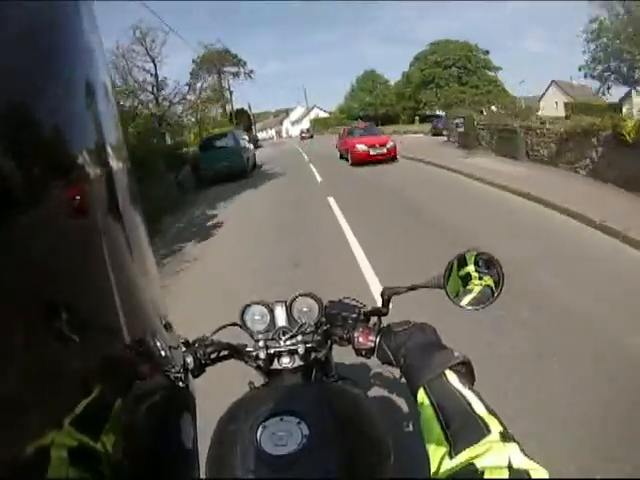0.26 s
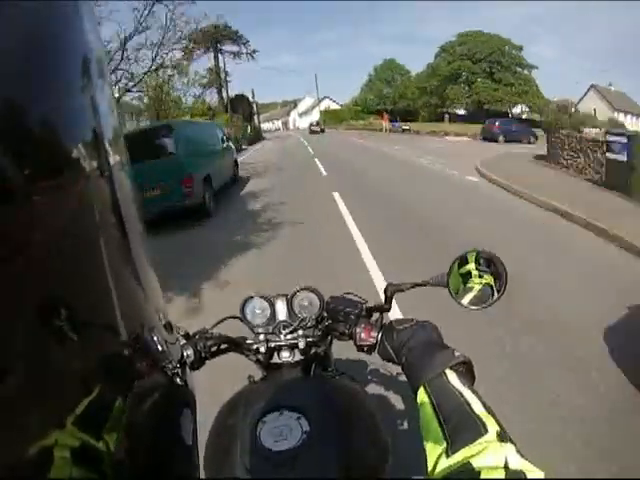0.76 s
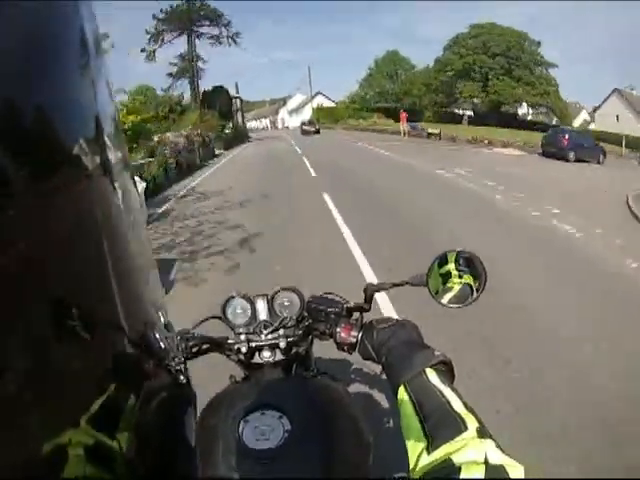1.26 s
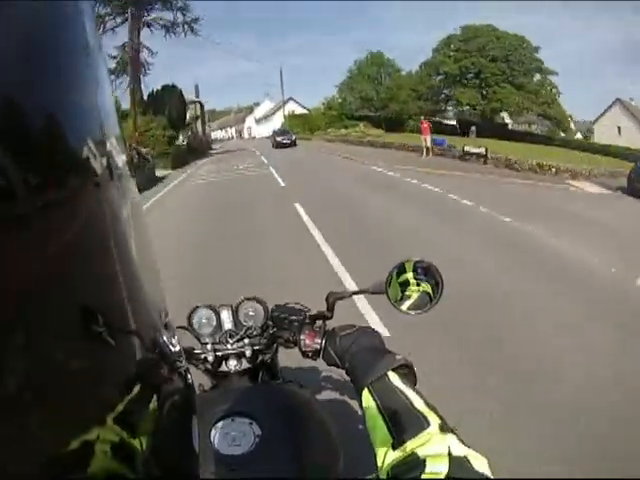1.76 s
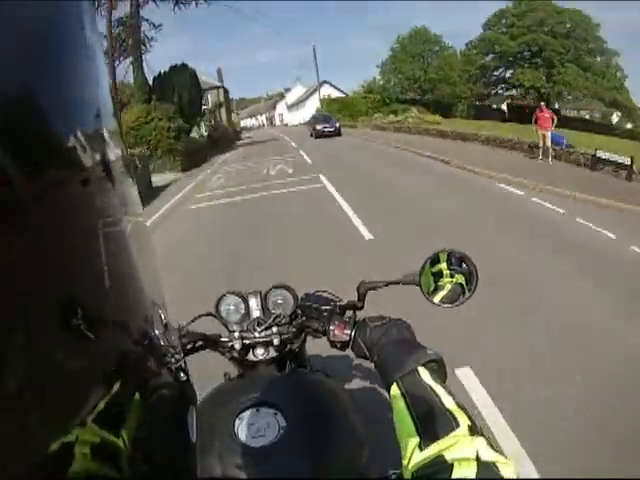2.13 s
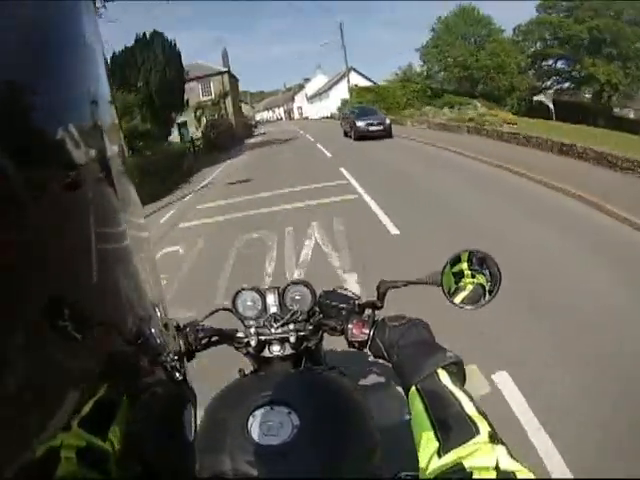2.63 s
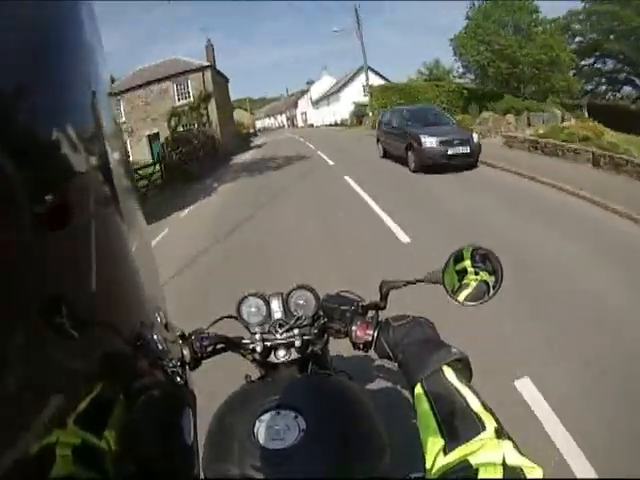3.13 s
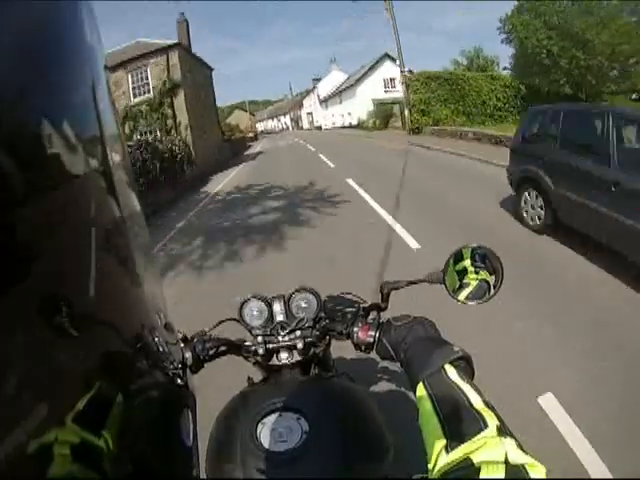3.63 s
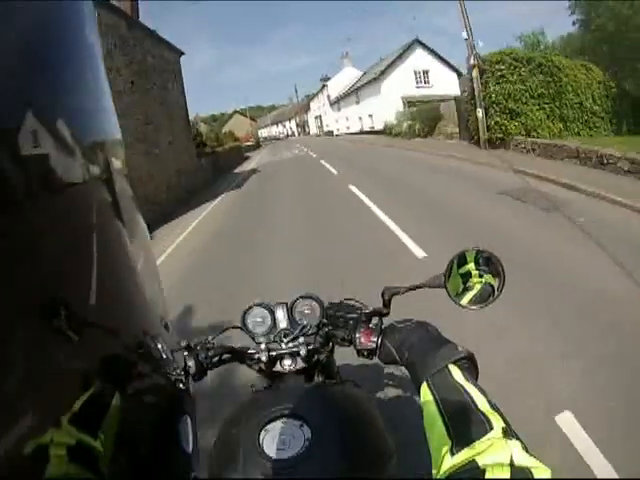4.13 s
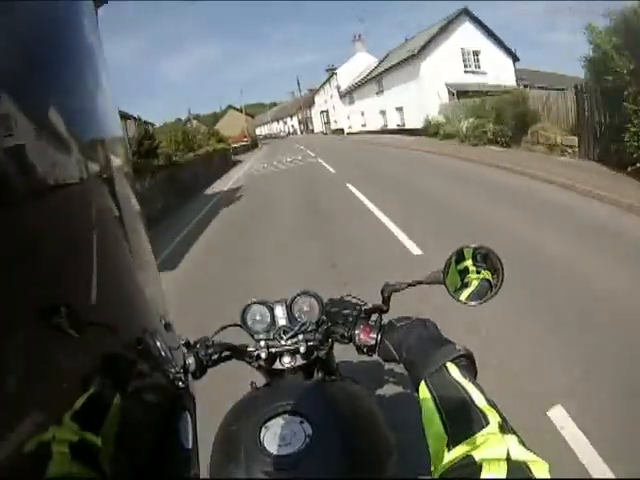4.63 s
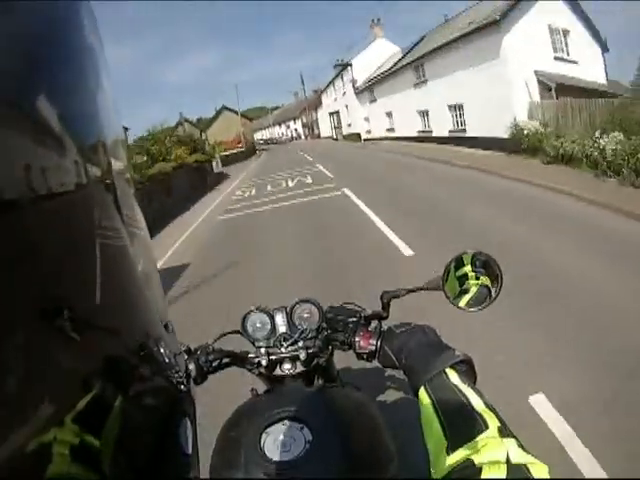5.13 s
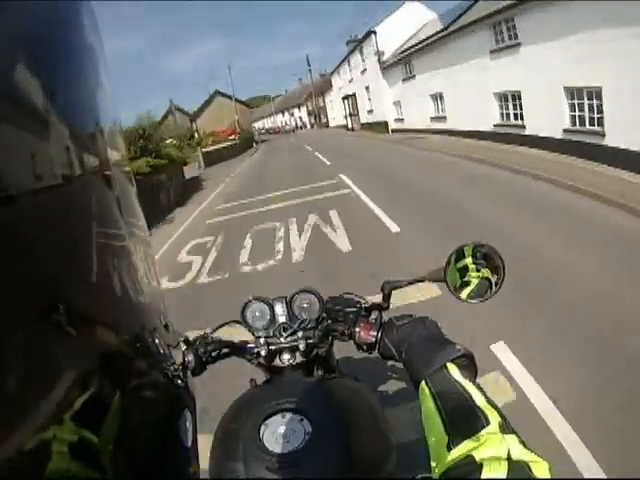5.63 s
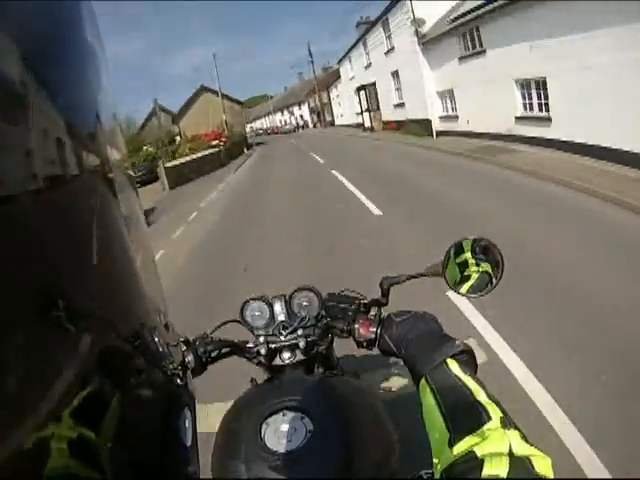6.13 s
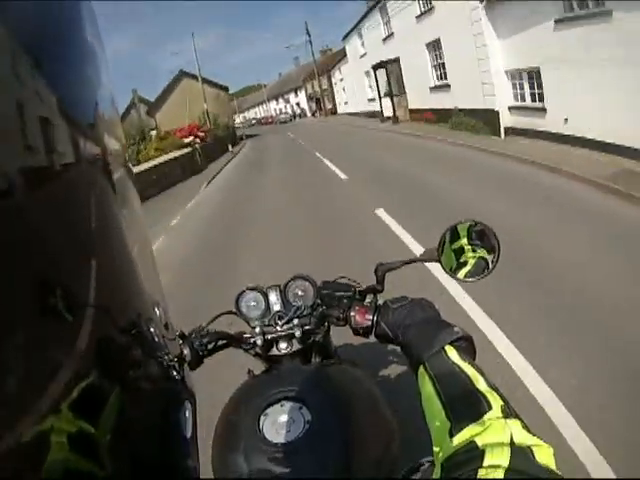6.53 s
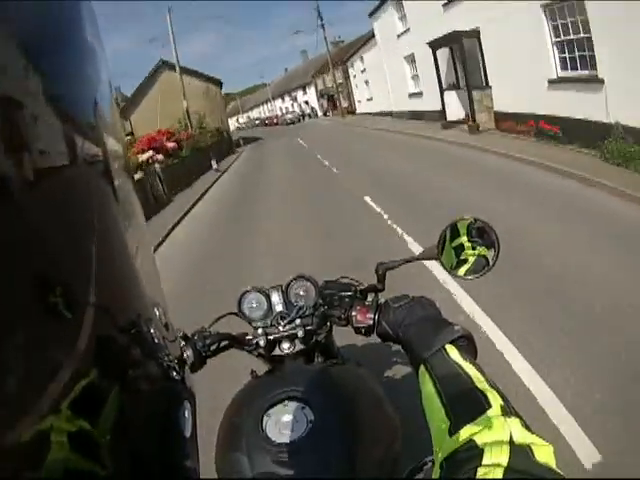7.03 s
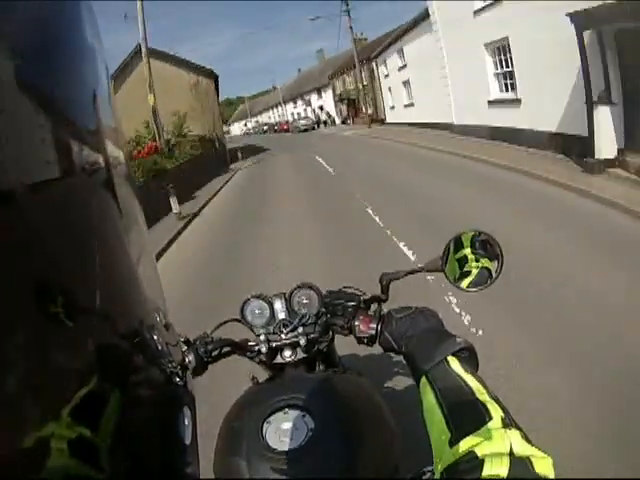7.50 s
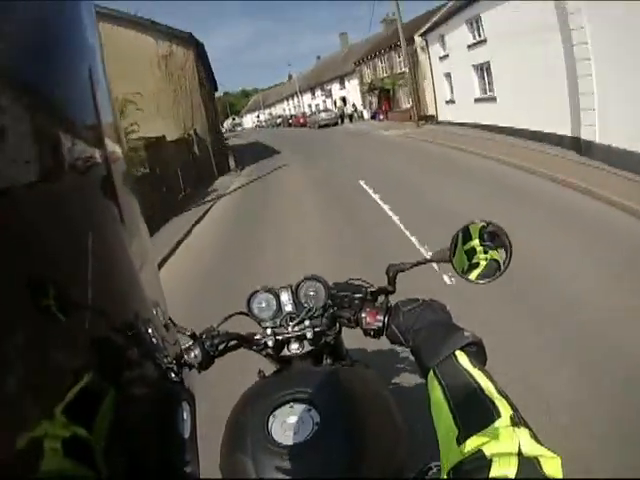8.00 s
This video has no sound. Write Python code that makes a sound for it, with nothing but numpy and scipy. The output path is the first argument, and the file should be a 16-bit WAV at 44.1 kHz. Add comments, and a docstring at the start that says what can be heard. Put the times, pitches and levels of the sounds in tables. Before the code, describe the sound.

Wind rushes, rumbles and hisses over a small cased camera on a motorcycle rider's helmet, with a deep, fluttering buffet coming in uneven shoves. The engine hums faintly and evenly underneath. Grit ticks lightly on the case a couple of times, and later a bump gives one small knock. The wind gradually eases as the bike slows along a village road.

```python
"""Wind rumbles, rushes and hisses over a small camera in a closed plastic case on a rider's helmet,
easing as the motorcycle slows through a village. The case's resonances (the pitches it likes to
ring at) colour the wind, and swirls of air shake the camera's mount into a deep, unsteady tone.
The twin engine hums faintly below. A bump knocks the case once and grit ticks on it.
Behind it all lies the soft hiss of the microphone's electronics."""
import sys
import numpy as np
from scipy import signal
from scipy.fft import rfft, irfft, next_fast_len
from scipy.io import wavfile
from scipy.ndimage import uniform_filter1d, map_coordinates

SR = 44100
rng = np.random.default_rng(int(sys.argv[2]) if len(sys.argv) > 2 else 0)


def generate_wav(signal):
    """Clip the signal to [-1, 1] and save it as 16-bit WAV at the path in sys.argv[1]."""
    frames = np.transpose(np.atleast_2d(signal))
    scaled = np.clip(frames, -1, 1) * 32767
    pcm = np.round(scaled).astype(np.int16)
    wavfile.write(sys.argv[1], SR, pcm)


N = 364266


def amp(db):
    """Turn decibels into a number to multiply by."""
    return 10 ** (np.asarray(db) / 20)


def unit(x):
    """Scale a signal to an average (rms) size of 1."""
    return x / np.sqrt(np.mean(x ** 2) + 1e-20)


def level_at(points, hz):
    """Read between (frequency, level) points, on a log frequency scale."""
    freqs, levels = np.transpose(points)
    return np.interp(np.log(hz + 1), np.log(freqs + 1), levels)


def curves(rows):
    """Join timed rows with straight lines: one curve for each column after the time."""
    times, *columns = np.transpose(rows)
    return [np.interp(np.arange(N) / SR, times, column) for column in columns]


def swells(rows):
    """Add up one bell-shaped swell for each (peak time, length, height) row."""
    t = np.arange(N) / SR
    return sum(height * np.exp(-(2 * (t - peak) / length) ** 2) for peak, length, height in rows)


def wobble(rate):
    """A smooth curve through `rate` random values a second."""
    return map_coordinates(rng.standard_normal(int(N * rate / SR) + 4), [np.arange(N) * rate / SR])


def filtered(x, response):
    """Multiply each frequency in x by response(frequency)."""
    size = next_fast_len(N + SR // 2)
    return irfft(rfft(x, size) * response(np.fft.rfftfreq(size, 1 / SR)), size)[:N]


def shaped_noise(shape):
    """Steady noise of size 1, strong or weak at each frequency as the shape says."""
    return unit(filtered(rng.standard_normal(N), lambda hz: amp(level_at(shape, hz))))


# Tone colour of the electronic hiss: (frequency [Hz], relative level [dB])
ELECTRONICS_SHAPE = [(100, -12), (3000, 2.5), (9000, -11), (12000, -11), (14000, -12), (15500, -20)]

def electronics():
    """The microphone's electronics add a faint, steady hiss."""
    return amp(-66.0) * shaped_noise(ELECTRONICS_SHAPE)


# How the engine runs: (time [s], four-stroke cycles [per s], level [dB])
ENGINE_RUN = [(0, 24.5, -54), (1, 24.7, -52), (2, 24.8, -51), (3, 24.9, -51), (3.8, 25, -53),
              (4.5, 25.3, -58), (5.5, 25.7, -57), (6.3, 25.8, -52), (7, 25.6, -51), (7.7, 25.5, -52),
              (8.26, 25.6, -53)]
# The tones in its hum: (multiple of the cycle rate, relative level [dB])
ENGINE_TONES = [(3, -26), (4, -2), (5, -4.5), (7, -9.5), (10, -10.5), (11, -10.5)]

def engine():
    """The two cylinders fire unevenly, making a hum of low tones that each waver."""
    cycle_hz, level_db = curves(ENGINE_RUN)
    phase = 2 * np.pi * np.cumsum(cycle_hz) / SR + 0.21 * wobble(6)
    hum = sum(amp(tone_db + 2.1 * wobble(5)) * np.sqrt(2) * np.sin(multiple * phase)
              for multiple, tone_db in ENGINE_TONES)
    return amp(level_db) * hum


# Where the case rings; these also colour the wind: (pitch [Hz], width [Hz], wind boost [dB],
# strength when hit [dB], time to fade by 60 dB [s])
CASE_RESONANCES = [(98, 17, 1.5, 3, 0.11), (192, 42, -0.5, -3, .05), (274, 28, 5.5, 3.5, 0.078),
                   (427, 70, 1, -4, 0.1), (548, 43, 3, 4, 0.048), (932, 150, 3.5, -6.5, 0.053),
                   (1188, 102, 3.5, -3, 0.04), (1382, 260, 4.5, 6, 0.027), (1717, 180, -2.5, -0.5, 0.036),
                   (2126, 250, 1, 8, 0.025), (2546, 310, 3, -14, 0.025), (3050, 150, 4.5, -22, 0.024),
                   (3896, 160, 4.5, -12, 0.016), (4610, 120, 5.5, -20, .015), (4967, 165, 6, -25, .015),
                   (5090, 220, 6, -25, .015), (6180, 300, -1, -13, 0.015), (6457, 360, 10, -22, .012),
                   (8260, 440, 5, -28, .01), (11400, 1200, 3, -26, 0.0055), (13300, 650, 3, -37, .005)]
# Grit ticks, then the bump: (time [s], strength [dB], centre pitch [Hz], spread [octaves], contact [s])
HITS = [(2.0062, -11, 12500, 0.45, .0004), (3.4172, -24.5, 2300, 0.5, 0.0018),
        (3.419, -21, 5900, 0.43, 0.0011), (5.6034, -22.5, 1300, 1.22, 0.0018),
        (5.6066, -22, 200, 1.4, 0.0015)]

def case_hits():
    """Each hit rings the case, favouring the resonances near the hit's centre pitch."""
    track = np.zeros(N + SR)
    t = np.arange(SR // 5) / SR
    for start, hit_db, centre_hz, spread, contact in HITS:
        ring = 0
        for k, (hz, _, _, ring_db, fade_time) in enumerate(CASE_RESONANCES):
            off_centre_db = -6 * (np.log2(hz / centre_hz) / spread) ** 2
            fade = amp(ring_db + off_centre_db - 60 * t / fade_time)
            ring += (-1) ** k * fade * np.sin(2 * np.pi * hz * t)  # neighbours swing opposite ways
        rise = 1 - np.exp(-(t / contact) ** 2)
        track[round(start * SR):][:len(t)] += amp(hit_db) * rise * ring
    return track[:N]


# The mount's shaking: (time [s], pitch [Hz], level between shoves [dB])
MOUNT_TREND = [(0, 40, -36), (0.5, 41.97, -41.5), (0.8, 39.9, -43), (1.1, 43.64, -38), (1.5, 40.64, -41),
               (2.0, 42.47, -36), (2.4, 40.44, -40.5), (3.2, 44.95, -41.5), (3.65, 44.3, -48),
               (3.95, 40, -36), (4.5, 44, -46), (5.0, 38.43, -38.5), (5.4, 41.7, -43.5), (5.8, 38, -44.5),
               (6.5, 38.83, -43.5), (7.0, 41, -40), (7.6, 39.7, -44.5), (7.85, 33, -44.5),
               (8.26, 34.7, -47)]
# The wind's strongest shoves on the mount: (peak time [s], length [s], level [dB])
SHOVES = [(0.096, 0.067, -31.5), (0.32, 0.063, -35), (0.467, 0.11, -30), (0.603, 0.11, -29.5),
          (0.887, 0.034, -34), (0.998, .12, -30.5), (1.364, 0.098, -31.5), (1.588, .1, -39.5),
          (1.852, 0.24, -34), (2.085, 0.056, -31.5), (2.186, 0.058, -31.5), (2.45, 0.11, -32),
          (2.632, .06, -35), (2.75, 0.1, -32), (3.012, 0.082, -38), (3.16, .08, -37), (3.31, 0.078, -32.5),
          (3.466, 0.074, -31.5), (3.569, .06, -33), (3.762, 0.093, -33), (3.93, 0.13, -40),
          (4.171, 0.07, -40), (4.321, 0.066, -44), (4.602, .06, -37), (4.70, 0.061, -36.5),
          (5.062, .08, -37), (5.24, 0.098, -45), (5.632, 0.078, -39), (6.289, .1, -40), (6.43, 0.063, -38),
          (6.60, 0.088, -35), (6.82, 0.082, -40), (7.23, .12, -36.5), (7.54, .2, -37), (8.02, .1, -42),
          (8.167, 0.074, -42)]
# Tone colour of the air's low thudding: (frequency [Hz], relative level [dB])
THUD_SHAPE = [(8, -48), (15, -10), (27, 4.5), (40, -9.5), (52, -2), (66, -16.5), (90, -42), (200, -120)]

def mount_shake():
    """Swirls of air keep kicking the mount's lowest resonance: an unsteady tone amid low thudding."""
    hz, calm_db = curves(MOUNT_TREND)
    shoves = swells([(peak, length, amp(db)) for peak, length, db in SHOVES])
    swing = amp(calm_db + 2.3 * wobble(13)) + shoves
    flutter = amp(1.5 * wobble(45))
    phase = 2 * np.pi * np.cumsum(hz + 2.546 * wobble(30)) / SR
    tone = np.sqrt(2) * flutter * np.sin(phase)
    average_swing = uniform_filter1d(swing, size=SR // 2)
    thud_gain = amp(-8.5) * average_swing * (swing / average_swing) ** 0.25  # partly follows each shove
    return swing * tone + thud_gain * shaped_noise(THUD_SHAPE)


def case_boost_db(hz):
    """Each resonance of the case raises (or slightly lowers) the noise near its pitch."""
    return sum(boost_db / (1 + (2 * (hz - pitch) / width) ** 2)
               for pitch, width, boost_db, *_ in CASE_RESONANCES)


def air_noise(shape, patchy_db):
    """Noise of size 1 with random louder and softer patches, heard through the case."""
    grid = signal.stft(rng.standard_normal(N), nperseg=512)[2]  # noise split by frequency and time
    patches = uniform_filter1d(rng.standard_normal(grid.shape), size=8, axis=0)
    patches = uniform_filter1d(patches, size=8, axis=1)
    noise = signal.istft(grid * amp(patchy_db * unit(patches)), nperseg=512)[1][:N]
    return unit(filtered(noise, lambda hz: amp(level_at(shape, hz) + case_boost_db(hz))))


# The wind easing as the bike slows: (time [s], rumble [dB], rush [dB], hiss [dB])
WIND_LEVELS = [(0, -36, -34.5, -45.5), (0.6, -38.5, -35, -46.5), (1.0, -39, -36.5, -48.5),
               (1.3, -40.5, -38.5, -51.5), (2.2, -40, -38, -51.5), (3.0, -41, -38.5, -51.5),
               (3.5, -40.5, -39, -50.5), (4.1, -42, -39.5, -51.5), (5.0, -42, -40, -53.5),
               (5.3, -43.5, -42, -56), (5.6, -44.5, -43.5, -57.5), (7.0, -43.5, -43, -56.5),
               (8.26, -45.5, -44, -58)]
# Gusts, and lulls where negative: (peak time [s], length [s], change in hiss [dB])
GUSTS_AND_LULLS = [(0.16, 0.087, -1.5), (0.58, 0.16, 2), (0.79, 0.18, -2.5), (0.90, 0.11, 3.5),
                   (1.01, 0.075, 1), (1.36, .08, 2), (1.44, .07, -1), (2.17, 0.079, -3),
                   (2.53, 0.091, -0.5), (2.68, .12, 2), (2.80, .08, -1), (2.91, .08, 3), (3.24, 0.21, 2),
                   (3.46, 0.12, 4), (3.65, .12, -1), (3.88, 0.081, 3.5), (4.05, 0.072, 2.5),
                   (4.15, .1, 0.5), (4.42, .1, 2)]
# Tone colours of the wind's four layers, low to high: (frequency [Hz], relative level [dB])
RUMBLE_SHAPE = [(20, -45), (50, -26.5), (70, 1.5), (130, -1), (220, 0), (330, -4), (500, -6), (700, -11.5),
                (1100, -14), (2500, -27), (5000, -120)]
RUSH_SHAPE = [(200, -120), (500, -21.5), (800, -8), (1080, -7), (1180, -2), (1400, -2), (1700, 0.5),
              (2300, -1), (2750, -10), (3500, -18), (7000, -120)]
HISS_SHAPE = [(1200, -120), (2400, -22), (3000, -4.5), (3700, -2.5), (4300, -4.5), (5600, -7),
              (7000, -10.5), (7800, -13.5), (8800, -24.5), (11000, -41), (15500, -120)]
FIZZ_SHAPE = [(5000, -120), (7600, -9), (8400, 0.5), (9200, -3), (11000, -6.5), (13000, -14), (15500, -22)]

def wind():
    """Air streams over the case. Gusts move the high layers most; small swirls flutter all four."""
    rumble_db, rush_db, hiss_db = curves(WIND_LEVELS)
    gust_db = swells(GUSTS_AND_LULLS) + 0.53 * wobble(12)  # with small random gusts on top
    swirl = wobble(60)
    rumble_db += 0.52 * gust_db + 0.54 * swirl + 0.22 * wobble(25)
    rumble = amp(rumble_db) * air_noise(RUMBLE_SHAPE, patchy_db=0.38)
    rush_db += 0.59 * gust_db + 0.42 * swirl + 0.31 * wobble(10)
    rush = amp(rush_db) * air_noise(RUSH_SHAPE, patchy_db=0.4)
    hiss_db += gust_db
    hiss = amp(hiss_db + 0.5 * swirl + 0.49 * wobble(25)) * air_noise(HISS_SHAPE, patchy_db=0.57)
    # Faster air sounds brighter: the fizz rises and falls further than the hiss.
    fizz_db = -67.5 + 1.2 * (hiss_db + 50.5) + 0.5 * swirl + 0.7 * wobble(11)
    fizz = amp(fizz_db) * air_noise(FIZZ_SHAPE, patchy_db=1.2)
    return rumble + rush + hiss + fizz


def scene():
    """Everything reaches one microphone inside the case."""
    return (mount_shake() + wind() + engine() + case_hits() + electronics())[None]


def record(dry):
    """The camera cuts off the very highest treble."""
    top_hz = 15270
    return filtered(dry[0], lambda hz: hz < top_hz)[None]


dry = scene()
out = record(dry)
generate_wav(out)
```